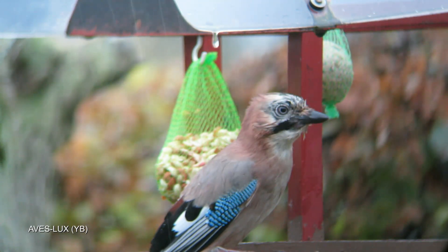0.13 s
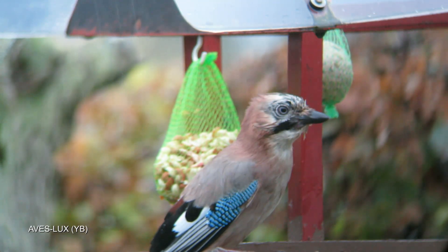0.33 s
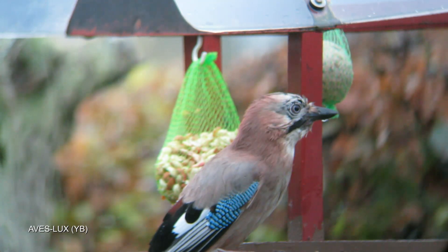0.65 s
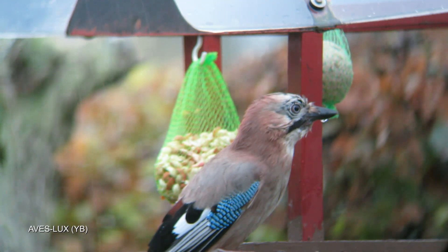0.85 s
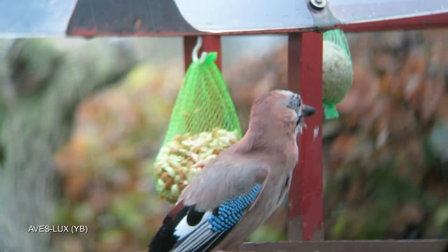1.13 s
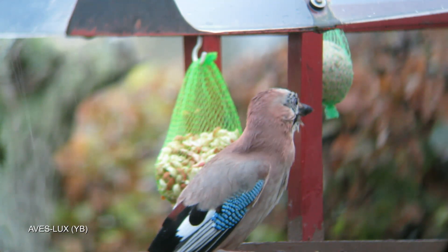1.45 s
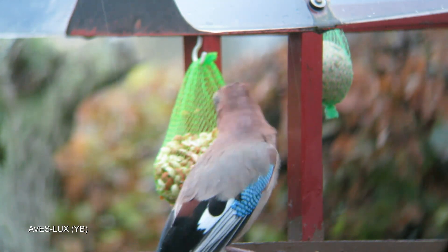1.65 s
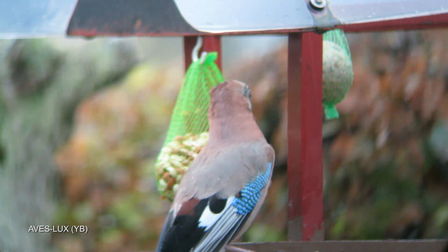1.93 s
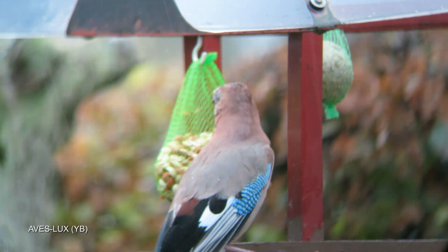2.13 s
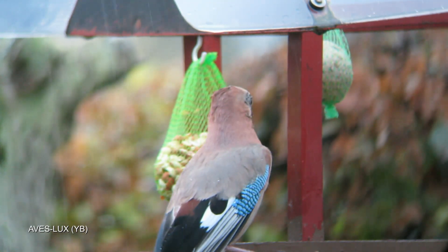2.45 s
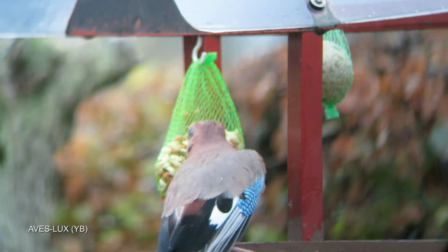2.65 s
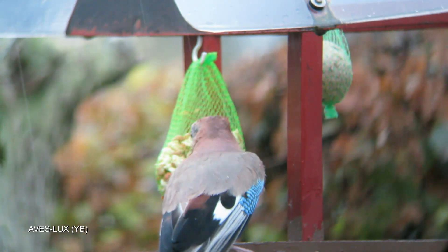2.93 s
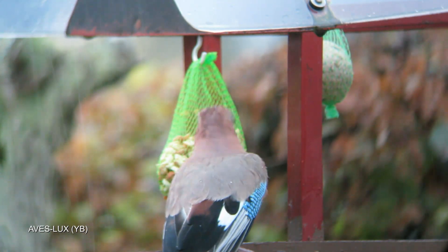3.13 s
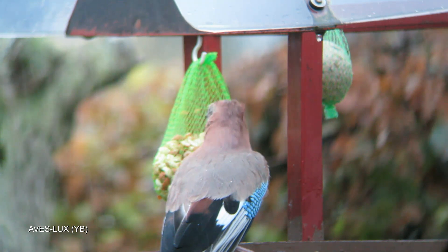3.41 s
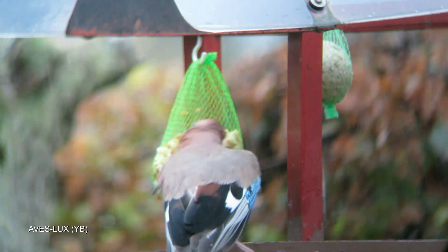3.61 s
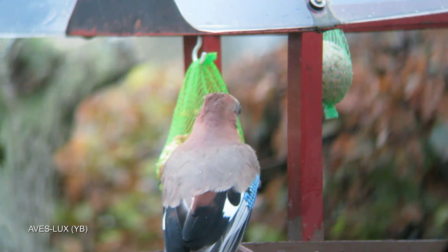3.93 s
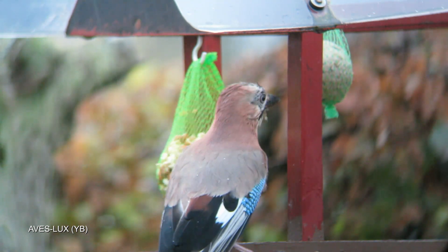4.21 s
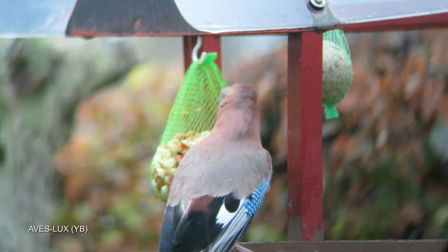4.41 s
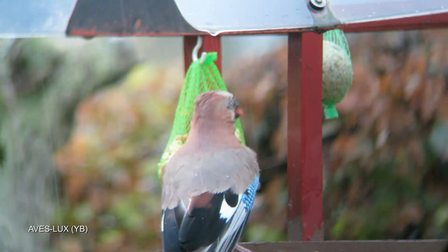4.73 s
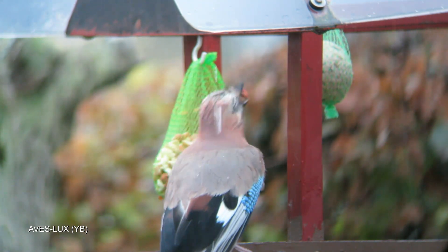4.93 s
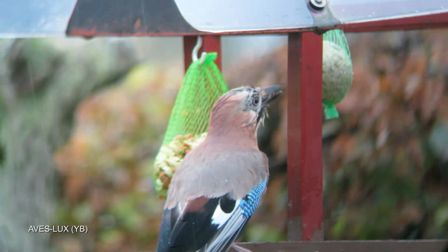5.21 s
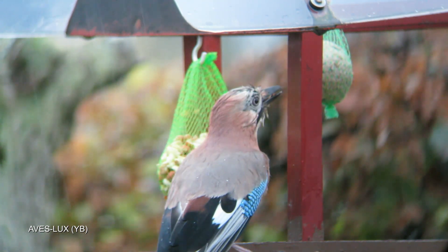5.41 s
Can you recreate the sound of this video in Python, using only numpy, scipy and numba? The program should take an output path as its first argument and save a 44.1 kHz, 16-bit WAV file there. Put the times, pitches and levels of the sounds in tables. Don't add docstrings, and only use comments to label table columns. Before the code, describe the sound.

A garden with trees, heard from close to a screeching jay. The stretch opens partway through a loud, harsh screech ending near 0.2 s. Further near screeches come at about 0.7, 1.9, 2.5, 3.8 and 5.4 s, each 0.3 to 0.5 s long: a hoarse burst, a slightly clearer nasal tone, usually climbing, then a torn rasp cut off quickly. Other jays, farther away and blurred, rasp at 0.2, 0.6, 1.2, 2.3, 2.8, 3.4, 4.4 and 5.0 s, the later ones strongest. All calls ring on among the trees for just under a second. Underneath are soft rustle, thin hiss and almost inaudible hum. Very faint high crickets buzz in bursts around 1, 2.5, 3.9 and 5 s, another pulsing slowly. A low thud comes at 0.24 s, a tiny tick at 1.5 s, a dove coo at 3.1 s, a crisp twig snap at 3.36 s and a faint peep at 4.4 s.

```python
import sys
import numpy as np
from scipy import signal
from scipy.fft import rfft, irfft
from scipy.io import wavfile
from scipy.ndimage import uniform_filter1d
from numba import njit

SR = 44100
rng = np.random.default_rng(int(sys.argv[2]) if len(sys.argv) > 2 else 0)


def master(y):
    cut = np.clip(np.atleast_2d(y).T, -1, 1)
    pcm = np.round(cut * 32767)
    wavfile.write(sys.argv[1], SR, pcm.astype(np.int16))


def volts_from_db(level):
    exponent = np.asarray(level, float) / 20
    return 10 ** exponent


N = 245637

# freq_hz, density_db_per_hz
JAY_MURMUR_SPECTRUM = [(12, -51), (20, -29.5), (178, -37.5), (252, -22), (339, -35), (517, -26.5), (585, -27.5),
                       (750, -21.5), (1010, -6), (1880, -5), (2290, 2), (3250, -4.5), (7550, -36.5),
                       (9820, -64.5), (16600, -120)]
# freq_hz, density_db_per_hz
HISS_SPECTRUM = [(20, 4.5), (200, -8), (400, -15), (3000, -7), (7000, -30), (8500, -11), (10500, -5),
                 (12200, -8), (13000, -21), (14500, -29), (16000, -47)]
# freq_hz, level_db
MAINS_HUM = [(100, -84), (150, -85.5), (240, -87.5)]
# start_s, peak_db, centre_hz, width_hz, decay_s
KNOCKS = [
    (.243, -52, 400, 500, .008),
    (1.47, -65, 13400, 3000, 0.0017),
    (3.363, -38.5, 3330, 2000, 0.0031),
]
# start_s, length_s, level_db
BUZZ_BURSTS = [
    (-.2, .4, -77),
    (0.992, 0.62, -71.5),
    (2.508, 0.48, -71),
    (3.898, 0.49, -71),
    (5.006, .8, -72),
]
# centre_s, width_s, gain_db
THROB_SWELLS = [
    (3.551, .4, 4.5),
    (5.0, 0.44, 2.5),
]
# start_s, length_s, first_hz, top_hz, level_db
COO = (3.12, .21, 530, 605, -72)
# start_s, length_s, first_hz, last_hz, level_db
PEEP_NOTE = (4.36, .045, 5530, 5460, -64)
# start_s, length_s, top_db, rise_s, end_sag_db
FAR_CALLS = [
    (0.238, .33, -30.5, 0.11, -6.5),
    (0.577, 0.13, -32, 0.12, 1.5),
    (1.187, 0.64, -32.5, 0.038, 0.5),
    (2.331, 0.18, -34, 0.053, 5.5),
    (2.805, 0.34, -31, 0.0077, -16),
    (3.379, .43, -30, 0.1, -6),
    (4.431, 0.47, -27, 0.11, -4.5),
    (4.957, 0.47, -28, 0.036, -12),
]
# freq_hz, density_db_per_hz
FAR_SPECTRUM = [(290, -75.5), (500, -50.5), (882, -10.5), (1190, -13.5), (1300, -11.5), (1390, -3.5),
                (2000, -4), (2370, -1), (3610, -3), (3950, -8), (4960, -14), (7550, -32.5), (9820, -77.5),
                (16600, -120)]
# centre_hz, width_hz, lift_db
FAR_RESONANCES = [(1203, 290, 4.5), (2240, 1600, 2), (3250, 400, -0.5), (3380, 100, -25.5)]
# start_s, length_s, top_db, attack_s, swell_db (attack end to top)
SCREECHES = [
    (-.2, .385, -17, .04, 1),
    (0.661, .51, -20.5, 0.041, 1.5),
    (1.88, .425, -19, 0.042, 5.5),
    (2.46, .355, -19.5, 0.087, 0),
    (3.769, 0.3355, -18, 0.047, 2),
    (5.425, .3, -18.5, 0.012, 6.5),
]
# time_s, pair_rate_hz
PAIR_RATE = [
    [(0, 332), (.185, 322)],
    [(.665, 250), (.82, 289), (.94, 307), (1.0, 320), (1.175, 325)],
    [(1.875, 247), (2.09, 298), (2.11, 315), (2.17, 332), (2.21, 338), (2.3, 325)],
    [(2.46, 270), (2.54, 285), (2.6, 292), (2.64, 301), (2.815, 310)],
    [(3.775, 252), (3.91, 290), (3.95, 293), (3.97, 308), (4.0, 322), (4.12, 310)],
    [(5.425, 262), (5.57, 295)],
]
# from_s, to_s, roughness_0_to_1
CLEAR_STRETCH = [
    (-.12, -.06, .4),
    (.79, .9, .45),
    (2.0, 2.14, .34),
    (2.54, 2.62, .36),
    (3.88, 3.94, .35),
    (5.53, 5.6, .3),
]
# beak_brightness_db, lowest_resonance_lift_db, third_resonance_lift_db
BEAK_AIM = [
    (3.5, 0, -4.5),
    (0, -4.5, 3),
    (0, 2.5, -3.5),
    (0.5, 1.5, -5),
    (-0.5, -1, 8.5),
    (1.5, -3, 1),
]
# freq_hz, density_db_per_hz
NEAR_SPECTRUM = [(290, -81.5), (500, -45.5), (744, -24.5), (955, -13), (1060, -14.5), (1570, -2),
                 (1830, -10), (1950, -0.5), (3410, -3), (3860, -5), (4790, -8), (5250, -17.5), (6300, -22),
                 (7550, -35.5), (9820, -64.5), (16600, -120)]
# partial_ridden, lowest_hz, highest_hz, rough_lift_db, clear_lift_db (the third
# stays at 2870 Hz)
NEAR_RESONANCES = [(6, 1580, 2080, 0, -1.5), (8, 2200, 2450, -4.5, -1.5), (10, 3300, 2870, -9, -0.5),
                   (16, 4600, 4900, -4.5, 6), (20, 6000, 7500, -6, 9)]

JAY_MURMUR_DB, HISS_DB = -43.5, -71.5
BUZZ_EDGE_DB, BUZZ_RISE_S, THROB_DB = -3, .22, -80.5
COO_GLIDE_S, COO_ONSET_DB = .11, -8
FAR_ONSET_DB, FAR_HOLD_SHARE, FAR_FADE_S = -6, 0.36, .025
FAR_PAIR_HZ, FAR_DRIFT_SHARE, FAR_BRIGHT_DB = 299.7, .015, 1
FAR_ROUGHNESS, FAR_CLEARING = .72, .1
ONSET_DB, TOP_SHARE, SAG_DB, RELEASE_S, RELEASE_DB = -14.5, 0.52, -2, 0.035, -12
ROUGH_START, ROUGH_END, BREAKUP_S = .92, .84, .085
WEAK_LOW, WEAK_HIGH, WEAK_FROM_HZ, WEAK_TO_HZ = .5, .82, 265, 310
THROAT_WIDTH_HZ, THROAT_DRIFT_SHARE = 240., .07
PATCHY_DB, PATCH_RATE_HZ = 3, 14
GAPE_TOP_HZ, GAPE_REST_HZ, GAPE_ROUGH_DB, GAPE_CLEAR_DB = 3640, 3180, -4.5, 9.5
BEAK_OPEN_DB, BEAK_SHUT_DB, BEAK_SHUTS_S = 0, -6.5, 0.089
TREES_T60_S, TREES_DAMP = 0.91, 0.14
CLIP_AT = 0.2


def level(x, db):
    return x * volts_from_db(db) / np.sqrt(np.mean(x ** 2))


def even(x, seconds=.04):
    return x / np.sqrt(uniform_filter1d(x ** 2, int(seconds * SR)))


def walk(rate_hz):
    hold = int(SR / rate_hz)
    steps = np.repeat(rng.standard_normal(N // hold + 1), hold)
    return 1.3 * uniform_filter1d(uniform_filter1d(steps, hold), hold)[:N]


def curves(tables, fade_s=0.0072):
    t = np.arange(N) / SR
    rows = np.concatenate(tables)
    gate = 0
    for table in tables:
        inside_s = np.minimum(t - table[0][0] + fade_s, table[-1][0] + fade_s - t)
        gate = gate + np.clip(inside_s / fade_s, 0, 1)
    return [np.interp(t, rows[:, 0], column) for column in rows.T[1:]], np.minimum(gate, 1)


def shaped(start, length, top_db, rise, onset_db, hold_share, sag_db):
    top = start + rise
    return [(start, top_db + onset_db), (top, top_db), (top + hold_share * (length - rise), top_db),
            (start + length, top_db + sag_db)]


def colour(x, points):
    hz, db = np.transpose(points)
    grid_hz = np.linspace(1, SR / 2, 2049)
    gain_db = np.interp(np.log(grid_hz), np.log(hz), np.maximum(db, -90))
    cepstrum = irfft(np.log(volts_from_db(gain_db)))
    cepstrum[1:2048] *= 2
    cepstrum[2049:] = 0
    return signal.fftconvolve(x, irfft(np.exp(rfft(cepstrum))))[:N]


@njit
def svf(x, hz, width_hz):
    y, band, low = np.empty(len(x)), 0., 0.
    for i in range(len(x)):
        g, k = np.tan(np.pi * hz[i] / SR), width_hz / hz[i]
        v = (band + g * (x[i] - low)) / (1 + g * (g + k))
        band, low, y[i] = 2 * v - band, low + 2 * g * v, k * v
    return y


def noise_band(hz, width_hz):
    return svf(rng.standard_normal(N), np.full(N, hz), width_hz)


def air():
    t = np.arange(N) / SR
    jay_murmur = level(colour(rng.standard_normal(N), JAY_MURMUR_SPECTRUM), JAY_MURMUR_DB) * volts_from_db(0.6 * walk(2.5))
    hiss = level(colour(rng.standard_normal(N), HISS_SPECTRUM), HISS_DB)
    hum = sum(volts_from_db(db + 2.6 * walk(3.3)) * np.sin(2 * np.pi * hz * t) for hz, db in MAINS_HUM)
    return jay_murmur + hiss + hum


def ticks():
    out, t = np.zeros(N), np.arange(1500) / SR
    for start, db, hz, width_hz, decay in KNOCKS:
        knock = rng.standard_normal(len(t)) * np.exp(-t / decay)
        for _ in range(2):
            knock = svf(knock, np.full(len(t), 1. * hz), 1. * width_hz)
        out[int(start * SR):][:len(t)] += volts_from_db(db) * knock / np.abs(knock).max()
    return out


def cricket(gain, stroke_hz, sharpness, wing_hz, width_hz):
    turns = np.cumsum(stroke_hz * (1 + 0.022 * walk(2))) / SR
    strokes = (.5 + .5 * np.cos(2 * np.pi * turns)) ** sharpness
    ring = strokes * rng.standard_normal(N)
    for _ in range(2):
        ring = svf(ring, np.full(N, wing_hz), width_hz)
    return level(ring, 0) * gain


def crickets():
    (db,), gate = curves([shaped(start, length, top_db, BUZZ_RISE_S, BUZZ_EDGE_DB, .6, BUZZ_EDGE_DB)
                          for start, length, top_db in BUZZ_BURSTS], fade_s=.08)
    t = np.arange(N) / SR
    swell_db = sum(gain_db * np.exp(-((t - s) / width) ** 2) for s, width, gain_db in THROB_SWELLS)
    buzzer = cricket(volts_from_db(db) * gate, 122, 2.6, 11440.0, 3000.)
    throbber = cricket(volts_from_db(THROB_DB + swell_db), 10.3, 1.5, 10700.0, 2600.)
    return buzzer + throbber


def tone(hz):
    return np.sqrt(2) * np.sin(2 * np.pi * np.cumsum(hz) / SR)


def dove():
    start, length, first_hz, top_hz, top_db = COO
    points = [(start, first_hz, top_db + COO_ONSET_DB), (start + COO_GLIDE_S, top_hz, top_db),
              (start + length, .97 * top_hz, top_db)]
    (hz, db), gate = curves([points], fade_s=.03)
    return tone(hz) * volts_from_db(db + 2.1 * walk(30.2)) * gate


def peep():
    start, length, first_hz, last_hz, db = PEEP_NOTE
    (hz,), gate = curves([[(start, first_hz), (start + length, last_hz)]], fade_s=.012)
    return tone(hz) * volts_from_db(db + 2 * walk(60)) * gate


@njit
def beat(hz, rough, weak, chance, jitter, spread):
    pulses, phase, p, k = np.zeros(len(hz) + 1), np.empty(len(hz)), 0., 0
    for i in range(len(hz)):
        step = hz[i] * (1 + jitter * rough[i] ** 2 * chance[k, 0]) / SR
        p += step
        if p >= 1:
            p, k = p - 1, k + 1
            size = (1 - weak[i] * (k % 2)) * np.exp(spread * rough[i] * chance[k, 1])
            pulses[i] += size * p / step
            pulses[i + 1] += size * (1 - p / step)
        phase[i] = p
    return pulses[:-1], phase


def syrinx(pair_hz, rough, weak):
    pulse_hz = 2 * pair_hz * (1 + .005 * walk(60))
    pulses, phase = beat(pulse_hz, rough, weak, rng.standard_normal((N // 20, 2)), .1, .5)
    pulses = pulses - .6 * svf(pulses, np.full(N, 6500.), 4000.)
    noise_part = level(rng.standard_normal(N) * (0.35 + np.exp(-phase / 0.48)), 0)
    voice = np.sqrt(1 - rough ** 2) * level(pulses - pulses.mean(), 0) + rough * noise_part
    return voice * volts_from_db(0.5 * rough * walk(55))


def scatter(x, spray_s, gain):
    turn = -2j * np.pi * np.arange(N // 2 + 1) / N
    spectrum = rfft(x * signal.windows.tukey(N, .008 * SR / N))
    for lag in spray_s * SR * np.array([.31, .47, .73, 1]):
        delay = np.exp(turn * lag)
        spectrum = spectrum * (delay - gain) / (1 - gain * delay)
    return irfft(spectrum, N)


def far_jays():
    (db,), gate = curves([shaped(start, length, top_db, rise, FAR_ONSET_DB, FAR_HOLD_SHARE, sag_db)
                          for start, length, top_db, rise, sag_db in FAR_CALLS], fade_s=FAR_FADE_S)
    drift = 1 + FAR_DRIFT_SHARE * walk(4)
    rough = np.clip(FAR_ROUGHNESS + FAR_CLEARING * walk(6), .5, .95)
    source = colour(syrinx(FAR_PAIR_HZ * drift, rough, np.full(N, .45)), FAR_SPECTRUM)
    voice = source
    for hz, width_hz, lift_db in FAR_RESONANCES:
        voice = voice + volts_from_db(lift_db + PATCHY_DB * walk(7.4)) * svf(source, hz * drift, 1. * width_hz)
    voice = even(scatter(voice, .012, 0.7))
    bright_gain = volts_from_db(FAR_BRIGHT_DB + 3.0 * walk(5)) - 1
    voice = voice + bright_gain * svf(voice, np.full(N, 4800.), 1900.0)
    return voice * volts_from_db(db - 3) * gate


def effort():
    tables = []
    for start, length, db, attack, swell_db in SCREECHES:
        end = start + length
        tables.append([(start, db + ONSET_DB), (start + attack, db - swell_db),
                       (start + TOP_SHARE * length, db), (end - RELEASE_S, db + SAG_DB),
                       (end, db + RELEASE_DB)])
    return curves(tables, fade_s=0.0061)


def roughness():
    tables = []
    for (start, length, *_), (a, b, rough) in zip(SCREECHES, CLEAR_STRETCH):
        broken = b + BREAKUP_S
        tables.append([(start, ROUGH_START), (a, rough), (b, rough), (broken, ROUGH_END - .08),
                       (max(start + length, broken + .01), ROUGH_END)])
    return curves(tables)[0][0]


def throat(voice, pair_hz, clear, aim_db, low_db, third_db):
    resonances = []
    for row, lift_db in zip(NEAR_RESONANCES, (low_db, 0, third_db, aim_db, aim_db)):
        partial, low_hz, high_hz, rough_db, clear_db = row
        hz = np.clip(partial * pair_hz, low_hz, high_hz)
        resonances.append((hz, rough_db + lift_db, clear_db + lift_db))
    riding = 12 * pair_hz < GAPE_TOP_HZ
    gape_hz = uniform_filter1d(np.where(riding, 12 * pair_hz, GAPE_REST_HZ), 600)
    resonances.append((gape_hz, GAPE_ROUGH_DB, np.where(riding, GAPE_CLEAR_DB, GAPE_ROUGH_DB)))
    out = voice
    for hz, rough_db, clear_db in resonances:
        lift = volts_from_db(rough_db + (clear_db - rough_db) * clear)
        moving_hz = hz * (1 + THROAT_DRIFT_SHARE * (1 - clear) * walk(PATCH_RATE_HZ))
        patchy = volts_from_db(PATCHY_DB * walk(PATCH_RATE_HZ))
        out = out + lift * svf(voice, moving_hz, THROAT_WIDTH_HZ) * patchy
    return out


def beak():
    return curves([[(start, BEAK_OPEN_DB), (start + length - BEAK_SHUTS_S, BEAK_OPEN_DB),
                    (start + length, BEAK_SHUT_DB)] for start, length, *_ in SCREECHES])[0][0]


def near_jay():
    (db,), gate = effort()
    pair_hz, rough = curves(PAIR_RATE)[0][0], roughness()
    weak = np.interp(pair_hz, (WEAK_FROM_HZ, WEAK_TO_HZ), (WEAK_LOW, WEAK_HIGH))
    clear = np.clip((.85 - rough) / .55, 0, 1)
    (aim_db, low_db, third_db), _ = curves([[(start, *aim), (start + length, *aim)]
                                            for (start, length, *_), aim in zip(SCREECHES, BEAK_AIM)])
    voice = colour(syrinx(pair_hz, rough, weak), NEAR_SPECTRUM)
    small_body = signal.butter(3, 760, "high", fs=SR, output="sos")
    voice = signal.sosfilt(small_body, voice)
    voice = throat(voice, pair_hz, clear, aim_db, low_db, third_db)
    lag = SR * (.0062 + .00008 * walk(12))
    voice = voice + .4 * np.interp(np.arange(N) - lag, np.arange(N), voice)
    bright_gain = volts_from_db(beak() + aim_db) - 1
    voice = voice + bright_gain * svf(voice, np.full(N, 5000.), 3900.)
    voice = even(scatter(voice, .003, 0.6))
    murmur = level(noise_band(280., 430.0), -48.5) * volts_from_db(1.3 * walk(29))
    fizz = level(noise_band(8500., 4000.), -52.5) * volts_from_db(1.5 * walk(25))
    noise_part = (murmur + fizz) * volts_from_db(0.24 * (db + 25.5))
    return (voice + noise_part) * volts_from_db(db - 0.5) * gate


@njit
def trees(x, lags, gain, damp):
    line, soft, out = np.zeros((8, 8192)), np.zeros(8), np.zeros(len(x))
    for i in range(len(x)):
        total = 0.
        for k in range(8):
            soft[k] += (1 - damp) * (gain[k] * line[k, (i - lags[k]) & 8191] - soft[k])
            total += soft[k]
        out[i] = soft[0] - soft[1] + soft[2] - soft[3]
        for k in range(8):
            line[k, i & 8191] = x[i] + soft[k] - total / 4
    return out


def scene():
    background = air() + ticks() + crickets() + dove() + peep()
    far, near = far_jays(), near_jay()
    lags = rng.integers(900, 5000, 8)
    line_gain = volts_from_db(-60 * lags / SR / TREES_T60_S)
    echo = trees(near * volts_from_db(-13) + far * volts_from_db(-8.5), lags, line_gain, TREES_DAMP)
    return (background + far + near + echo)[None]


def low_pass(x):
    return signal.sosfilt(signal.butter(12, 14990, fs=SR, output="sos"), x)


def record(dry):
    excess = np.maximum(np.abs(dry) - CLIP_AT, 0)
    bent = dry - 0.053 * np.sign(dry) * excess
    edge = np.minimum(np.arange(N), N - np.arange(N))
    mix = bent * np.clip(edge / (.002 * SR), 0, 1)
    return low_pass(mix)


dry = scene()
out = record(dry)
master(out)
```